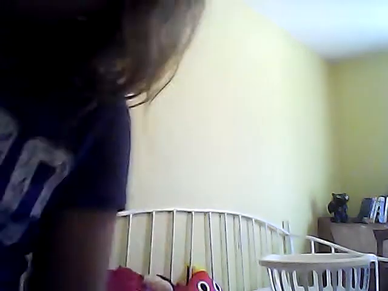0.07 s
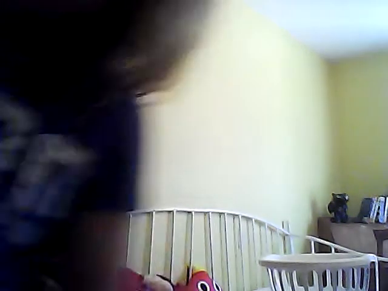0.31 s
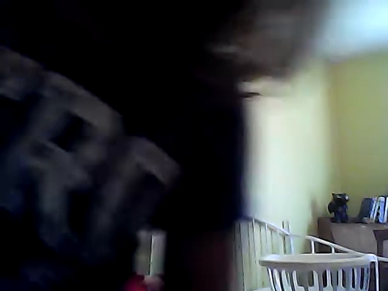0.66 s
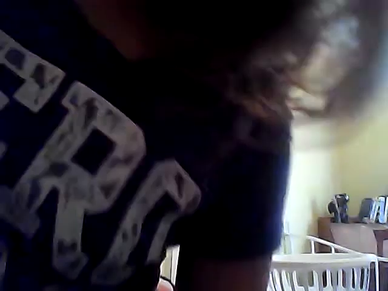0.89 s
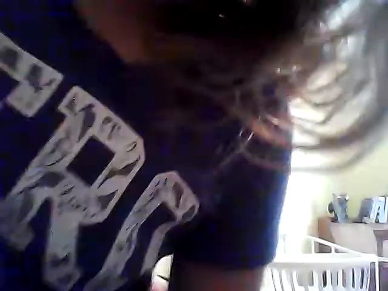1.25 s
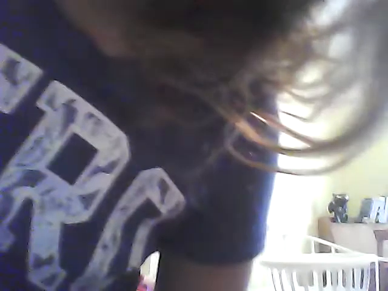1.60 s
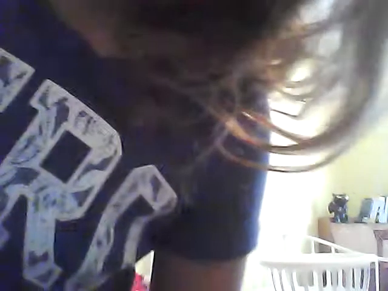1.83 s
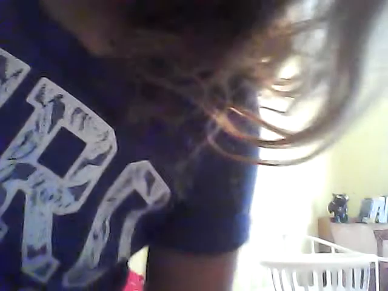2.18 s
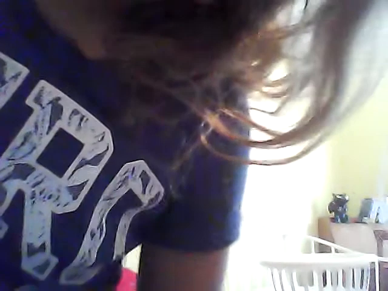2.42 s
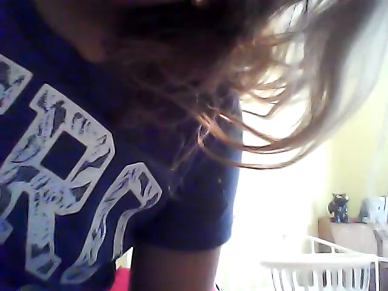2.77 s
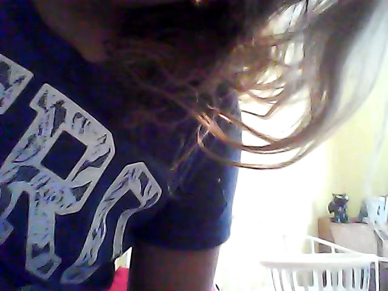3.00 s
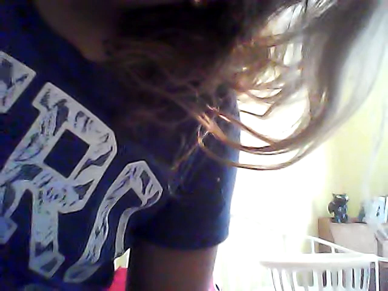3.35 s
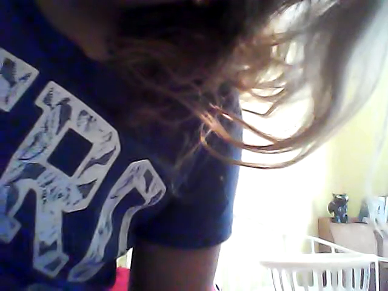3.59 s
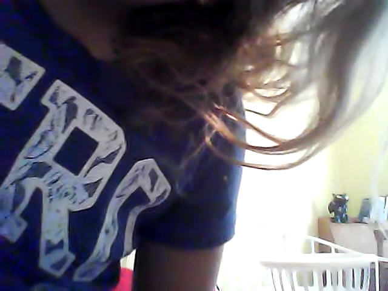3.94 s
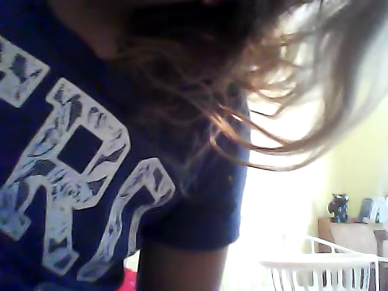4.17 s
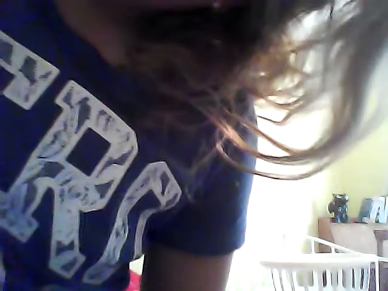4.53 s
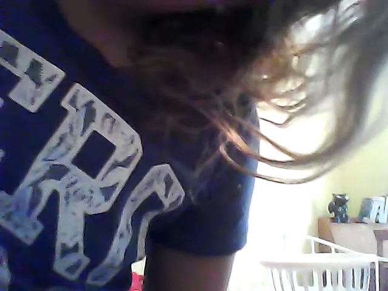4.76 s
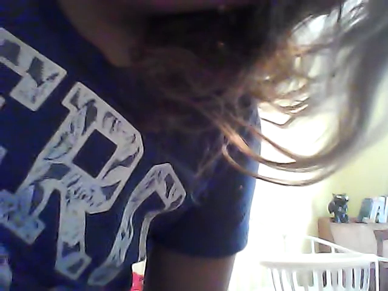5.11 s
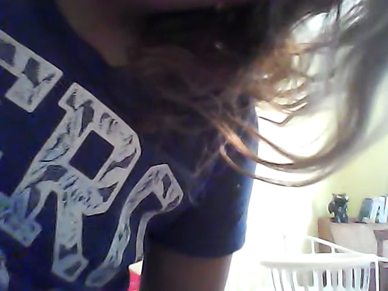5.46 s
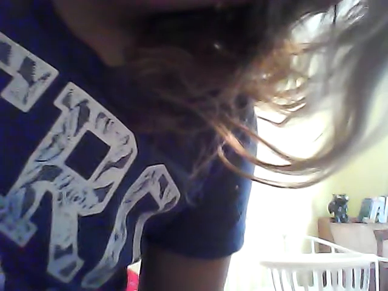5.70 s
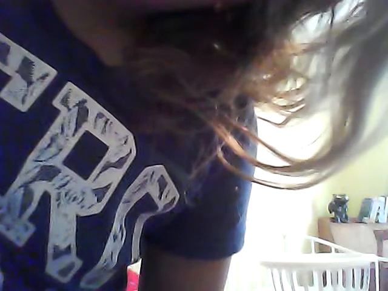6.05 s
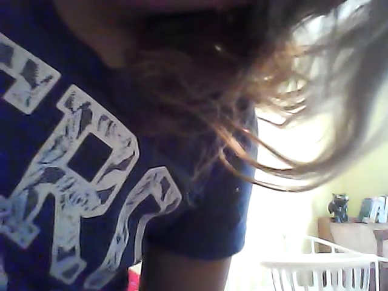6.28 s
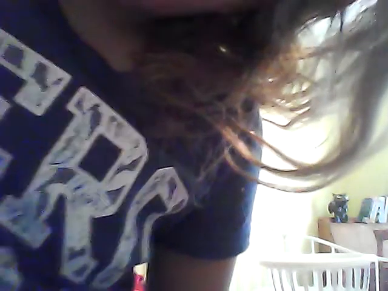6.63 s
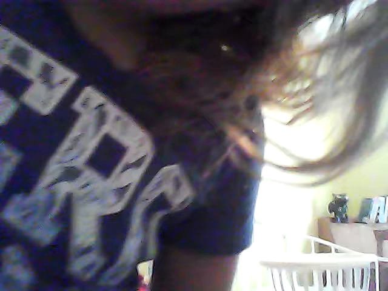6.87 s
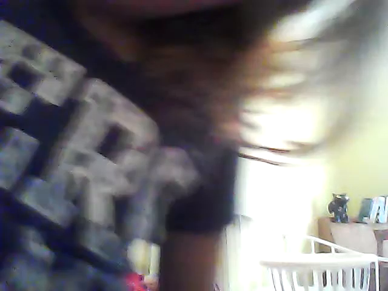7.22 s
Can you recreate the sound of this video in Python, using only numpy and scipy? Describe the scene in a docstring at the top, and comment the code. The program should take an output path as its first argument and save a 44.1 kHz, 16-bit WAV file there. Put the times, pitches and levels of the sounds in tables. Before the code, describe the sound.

Plastic things are handled right beside a microphone, with dull thumps, booming knocks, rubbing, small ticks and a hollow clatter.

```python
"""Soft rubbing and dull thumps, then booming knocks: someone at a bedroom desk fiddles with plastic
things right beside a small microphone. The knocks ring the housing that holds the microphone.
Sleeves and hands brush it, twisted plastic scrapes and ticks, a hollow object clacks on the desk.
Underneath lie low room noise, faint hiss and one thin passing tone. A limiter holds the hardest blows."""
import sys
import numpy as np
from scipy import signal
from scipy.fft import rfft, irfft
from scipy.io import wavfile
from scipy.ndimage import uniform_filter1d, minimum_filter1d

SR = 44100
rng = np.random.default_rng(int(sys.argv[2]) if len(sys.argv) > 2 else 0)


def output_pcm(signal):
    """Save a mono or channel-first signal as 16-bit PCM at the path in sys.argv[1].

    Samples are clipped to [-1, 1] before scaling.
    """
    pcm = np.clip(np.atleast_2d(signal).T, -1, 1) * 32767
    wavfile.write(sys.argv[1], SR, np.round(pcm).astype(np.int16))


N = 324135
RING_SAMPLES = 16384


def from_db(db):
    return 10 ** (np.asarray(db) / 20)


def rms_one(x):
    return x / np.sqrt(np.mean(x ** 2) + 1e-20)


def peak_one(blows):
    """Scales each row so its loudest 2 ms match a unit sine."""
    power = uniform_filter1d(blows ** 2, 88, axis=1)
    return blows / np.sqrt(2 * power.max(axis=1, keepdims=True))


def drift(knots_per_s):
    """Slow random curve, rms 1."""
    knots = rng.standard_normal(N // 40)
    return rms_one(np.interp(np.arange(N) / SR * knots_per_s, np.arange(len(knots)), knots))


def colour(x, spectrum, size=2048):
    """Minimum-phase filter from (Hz, dB) rows, along the last axis."""
    hz, db = np.transpose(spectrum)
    grid_hz = np.maximum(np.arange(size // 2 + 1) * SR / size, 1)
    magnitude = from_db(np.interp(np.log(grid_hz), np.log(hz), db))
    cepstrum = irfft(np.log(magnitude))
    cepstrum[1:size // 2] *= 2
    cepstrum[size // 2 + 1:] = 0
    pulse = irfft(np.exp(rfft(cepstrum)))
    filtered = signal.fftconvolve(np.atleast_2d(x), pulse[None], axes=1)
    return filtered[:, :x.shape[-1]].reshape(x.shape)


def resonate(x, hz, q):
    """One resonance, rms 1."""
    return rms_one(signal.lfilter(*signal.iirpeak(hz, q, fs=SR), x))


def swells(middles_s, lengths_s, levels_db):
    """Envelope of smooth rises and falls."""
    t, power = np.arange(N) / SR, np.zeros(N)
    for middle, length, db in zip(middles_s, lengths_s, levels_db):
        during = np.abs(t - middle) < length / 2
        power[during] += (from_db(db) * np.cos(np.pi * (t[during] - middle) / length)) ** 2
    return np.sqrt(power)


def slips(per_s, spread_db):
    """Friction as a stream of tiny slips of uneven size."""
    sizes = from_db(spread_db * np.minimum(rng.exponential(1, N), 4)) * rng.standard_normal(N)
    slipping = rng.random(N) < per_s * from_db(4 * drift(60)) / SR
    return sizes * slipping


def scatter(strokes, per_s, spread_db):
    """Small contacts as (s, dB) rows, strongest where the hand moves fastest."""
    rows = []
    for middle, length, db, *_ in strokes:
        jitter, force = rng.random((64, 2)).T
        s = middle - length / 2 + (np.arange(64) + jitter) / per_s
        speed = np.maximum(np.cos(np.pi * (s - middle) / length), 1e-3)
        level_db = db + 20 * np.log10(speed) + spread_db * np.sqrt(3) * (2 * force - 1)
        during = s < min(middle + length / 2, N / SR)
        rows.extend(np.transpose([s, level_db])[during])
    return np.array(rows)


def strike(starts_s, levels_db, modes, crack, crack_db, crack_t60_s, contact_s, vary_db, detune=0.027):
    """Each blow rings the modes with its own strengths and adds a short noisy crack."""
    hz, db, t60 = np.transpose(modes)[:, :, None]
    t = np.arange(min(RING_SAMPLES, int(2 * max(t60.max(), crack_t60_s) * SR))) / SR
    partials = np.sin(2 * np.pi * hz * t) * from_db(db - 60 * t / t60)
    rings = from_db(vary_db * rng.standard_normal((len(starts_s), len(modes)))) @ partials
    grips = 1 + detune * rng.standard_normal(len(starts_s))  # grip shifts the pitch
    rings = np.array([np.interp(t * grip, t, ring) for grip, ring in zip(grips, rings)])
    rings *= 1 - np.exp(-t / contact_s)  # soft contact builds slowly
    cracks = colour(rng.standard_normal(rings.shape) * from_db(-60 * t / crack_t60_s), crack)
    blows = peak_one(peak_one(rings) + from_db(crack_db) * peak_one(cracks))
    out = np.zeros(N + RING_SAMPLES)
    for s, gain, blow in zip(starts_s, from_db(levels_db), blows):
        start = max(round(s * SR), 0)
        out[start:start + len(t)] += gain * blow
    return out[:N]


# Steady noise spectra. Each row: frequency in Hz, density in dB.
ROOM_NOISE_SPECTRUM = [(25, -1), (70, 0.5), (135, 8), (190, -5.5), (270, -4.5), (700, -11), (1400, -12.5),
                       (2400, -18), (4000, -29), (16000, -51)]
HISS_SPECTRUM = [(1000, -23), (4000, -22.5), (6500, -14.5), (8100, -7.5), (9000, -7), (10200, -1.5),
                 (11800, -8.5), (13000, -9), (15500, -7.5), (16500, -11)]
# Hiss contour. Each row: time in seconds, relative level in dB.
HISS_CONTOUR = [(0.0, -65.5), (1.14, -62), (1.6, -56), (2.48, -66), (3.01, -61.5), (3.25, -65),
                (3.81, -66.5), (4.09, -62), (5.4, -60), (5.55, -53), (5.71, -55), (6.04, -61.5),
                (6.79, -63), (7.06, -60.5), (7.19, -56.5), (7.35, -77)]


def background():
    """Low room noise and a thin hiss that swells and sinks."""
    rumble, hiss = rng.standard_normal((2, N))
    rumble = from_db(-66) * rms_one(colour(rumble, ROOM_NOISE_SPECTRUM))
    hiss_db = np.interp(np.arange(N) / SR, *np.transpose(HISS_CONTOUR)) - 5
    return rumble + from_db(hiss_db) * rms_one(colour(hiss, HISS_SPECTRUM))


# Room decay. Each row: low edge in Hz, high edge in Hz, T60 in seconds, level in dB.
ROOM_BANDS = [(90, 270, 0.3, -2), (302, 510, 0.17, -8), (905, 2900, 0.28, -1.5), (3000, 40000, 0.14, -4)]


def bedroom(x, first_echo_s=0.012):
    """A diffuse tail starts with the nearest wall and dies band by band."""
    t = np.arange(RING_SAMPLES) / SR
    tail = 0
    for low_hz, high_hz, t60, db in ROOM_BANDS:
        band = signal.butter(2, [low_hz, min(high_hz, 0.45 * SR)], "band", fs=SR, output="sos")
        echoes = rng.standard_normal(len(t)) * (t > first_echo_s) * from_db(db - 60 * t / t60)
        tail = tail + signal.sosfilt(band, echoes)
    return signal.fftconvolve(x, tail / np.sqrt(np.sum(tail ** 2)))[:N]


def faint_tone(middle_s=3.45, length_s=0.8, level_db=-68):
    """A thin tone wavers and sinks, barely above the hiss."""
    middle_hz, sag_hz_per_s, waver_hz = 684, 100, 14
    hz = middle_hz - sag_hz_per_s * (np.arange(N) / SR - middle_s) + waver_hz * drift(25)
    tone = rms_one(np.sin(2 * np.pi * np.cumsum(hz) / SR))
    return swells([middle_s], [length_s], [level_db]) * tone


# Swells of fine hiss. Each row: middle in seconds, length in seconds, level in dB.
FINE_HISS_SWELLS = [(4.081, 0.92, -63.5)]


def fine_hiss(hz=10010, q=4.7):
    """A fine, narrow hiss near 10 kHz swells and fades."""
    hiss = resonate(rng.standard_normal(N), hz, q)
    return swells(*np.transpose(FINE_HISS_SWELLS)) * resonate(hiss, hz, q)


# Brief judder. Each row: middle in seconds, length in seconds, pitch in Hz, level in dB.
JUDDER = [(.824, 0.041, 305.4, -35.5)]


def judder():
    """Regular slips give a short tone."""
    middle_s, length_s, hz, db = JUDDER[0]
    tone = rms_one(np.sin(2 * np.pi * hz * np.arange(N) / SR))
    return swells([middle_s], [length_s], [db]) * tone


# Contact noise of a wall. Each row: frequency in Hz, density in dB.
WALL_SPECTRUM = [(100, -5), (400, 0.5), (700, 3), (1000, 0.5), (1550, -0.5), (1900, -10), (2500, -6.5),
                 (3300, -15.5), (6000, -57), (16000, -61)]


def brushing():
    """A wandering touch excites the wall modes unevenly: colour shifts, level stays even."""
    friction = colour(slips(per_s=5000, spread_db=2.6), WALL_SPECTRUM)
    brush = rms_one(friction)
    for hz, db, _ in WALL_MODES:
        brush += from_db(db - 14.5 + 16 * drift(35)) * resonate(friction, hz, q=5.3)
    return brush / np.sqrt(uniform_filter1d(brush ** 2, size=2600) + 1e-12)


# Hand and sleeve strokes. Each row: middle in seconds, length in seconds, rub in dB, brush in dB.
STROKES = [(0.0, 0.0793, -49, -61.5), (0.098, 0.019, -54, -58.5), (0.304, 0.36, -47, -61),
           (0.474, 0.05, -34, -47.5), (0.785, 0.081, -55, -56.5), (0.979, 0.028, -56, -83),
           (1.104, 0.089, -42, -55.5), (1.21, 0.12, -39.5, -48), (1.361, 0.18, -35, -46.5),
           (1.516, 0.094, -30.5, -41), (1.688, 0.11, -38.5, -42.5), (1.881, 0.16, -41.5, -48),
           (2.501, .24, -44.5, -53.5), (2.874, 0.35, -29.5, -43), (3.128, 0.16, -30, -45),
           (3.491, 0.13, -53, -57), (4.143, 0.23, -54.5, -60), (4.566, 0.23, -47.5, -60),
           (4.928, 0.48, -37.5, -56.5), (5.716, 0.56, -33, -31.5), (6.063, 0.11, -44.5, -51.5),
           (6.308, 0.13, -34.5, -38.5), (6.468, 0.13, -45.5, -54), (6.747, 0.19, -42.5, -48.5),
           (6.973, 0.24, -26, -32.5)]
# Low friction noise. Each row: frequency in Hz, density in dB.
RUB_SPECTRUM = [(30, -50.5), (65, -19), (110, -5.5), (145, 9), (195, 1), (270, 5), (340, 0.5), (408, 2),
                (480, -5), (650, -25), (1000, -36), (3000, -59), (16000, -78.5)]


def rubbing():
    """Sleeves and hands drag over the housing: a low rub and a brighter brush."""
    middle_s, length_s, rub_db, brush_db = np.transpose(STROKES)
    rub = rms_one(colour(slips(per_s=400, spread_db=2.2), RUB_SPECTRUM))
    return swells(middle_s, length_s, rub_db) * rub + swells(middle_s, length_s, brush_db) * brushing()


# Twists of plastic on plastic. Each row: middle in seconds, length in seconds, level in dB.
TWISTS = [(1.686, 0.095, -49.5), (2.081, 0.11, -48.5), (2.528, 0.054, -63), (2.671, 0.091, -54),
          (2.905, 0.26, -49.5), (3.134, 0.15, -54), (3.918, 0.14, -45.5), (4.208, 0.23, -60),
          (4.503, 0.089, -54), (4.578, 0.071, -44.5), (4.788, 0.26, -53.5), (5.617, 0.54, -45.5),
          (5.823, 0.27, -38.5), (6.31, 0.078, -51), (6.493, 0.31, -65), (6.791, 0.12, -61.5),
          (6.905, 0.077, -37.5), (7.049, 0.23, -41)]
# Plastic friction noise. Each row: frequency in Hz, density in dB.
GRIT_SPECTRUM = [(400, -10.5), (1500, 4), (2000, -7), (2800, -14.5), (3600, -7.5), (4700, -7), (5600, -12),
                 (9500, -13), (16000, -29)]


def scraping(squeak_hz=3540, squeak_q=3.1, squeak_db=-5.5):
    """Plastic scrapes in coarse slips, which also ring the parts in spurts."""
    flicker = from_db(7.5 * np.clip(drift(130), -2, 2))
    grit = rms_one(flicker * colour(slips(per_s=9000, spread_db=4.7), GRIT_SPECTRUM))
    spurts = from_db(9.5 * drift(90))
    ringing = resonate(slips(per_s=6900, spread_db=1.5), squeak_hz, squeak_q)
    squeak = from_db(squeak_db) * resonate(spurts * ringing, squeak_hz, squeak_q)
    return swells(*np.transpose(TWISTS)) * (grit + squeak)


# Small parts snapping out of a catch. Each row: start in seconds, relative level in dB.
SNAPS = [(1.4242, -35.5), (1.5978, -39.5), (2.0837, -30.5), (2.169, -45.5), (3.3383, -44.5), (3.8008, -39),
         (3.9472, -32.5), (4.088, -38), (4.1716, -35.5), (4.2705, -41), (4.593, -29), (4.7217, -29),
         (4.8471, -26.5), (4.8806, -29.5), (5.0815, -31.5), (5.6433, -23), (5.7634, -23), (5.7945, -22.5),
         (5.838, -25), (5.8761, -23.5), (5.8979, -22), (6.2911, -35), (6.3264, -27.5), (6.3867, -40),
         (6.4766, -45), (6.8272, -35.5), (7.073, -19.5), (7.0888, -28), (7.1092, -33), (7.1577, -27.5)]
# Modes of small parts and edges. Each row: frequency in Hz, level in dB, T60 in seconds.
PLASTIC_MODES = [(2520, -4, .022), (2970, -4, .024), (3560, 0, .026), (4000, -4, .016), (4600, -2, .016)]


def ticks():
    """Twisted parts catch and slip: short grainy squeaks, each with its own pitch."""
    twist_ticks = [(s, db + 10) for s, db in scatter(TWISTS, per_s=40, spread_db=4)]
    start_s, db = np.transpose(SNAPS + twist_ticks)
    catch = strike(start_s - 0.002, db - 9.5, PLASTIC_MODES, GRIT_SPECTRUM,
                   crack_db=0, crack_t60_s=0.025, contact_s=0.0022, vary_db=5, detune=0.09)
    slip = strike(start_s + 0.001, db - 4, PLASTIC_MODES[2:], GRIT_SPECTRUM,
                  crack_db=1.5, crack_t60_s=0.025, contact_s=0.0031, vary_db=1.5, detune=0.09)
    return catch + slip


# Contact noise of a hard edge. Each row: frequency in Hz, density in dB.
EDGE_SPECTRUM = [(300, -25), (1500, 9.5), (2700, -11.5), (3600, 5.5), (4700, -5.5), (5500, -8), (7400, -8),
                 (8300, -12), (9300, -8), (12000, -16), (16000, -19)]


def click(starts_s, levels_db):
    """A hard plastic edge snaps, then lets go more weakly 2-9 ms later."""
    release_s = starts_s + 0.002 + 0.007 * rng.random(len(starts_s))
    snaps_s = np.concatenate([starts_s, release_s])
    snaps_db = np.concatenate([levels_db - 4.5, levels_db - 14])
    return strike(snaps_s, snaps_db, PLASTIC_MODES, EDGE_SPECTRUM,
                  crack_db=6, crack_t60_s=0.023, contact_s=0.00023, vary_db=-1.5, detune=0.05)


# Padded blows. Each row: start in seconds, thud in dB, bump in dB.
THUMPS = [(0.352, -16.5, -44), (0.544, -16, -48), (1.333, -20, -24.5), (1.4224, -10.5, -3),
          (1.592, -11, -4.5), (1.67, -13, -32.5)]
# Low and middle body modes. Each row: frequency in Hz, level in dB, T60 in seconds.
THUD_MODES = [(69, -12, 0.24), (111, 2.5, 0.084), (132, 1.5, 0.12), (157.4, -2.5, 0.17), (208, -16, 0.25),
              (286, -12.5, 0.15)]
BUMP_MODES = [(330.2, 9.5, 0.018), (395.8, -9, 0.2), (458, -0.5, 0.032), (491, -16.5, 0.11),
              (842, -10, 0.06)]
# Dull contact noise. Each row: frequency in Hz, density in dB.
DULL_SPECTRUM = [(30, -25), (70, -16), (140, -12), (260, -2.5), (450, 5), (650, -28.5), (1000, -38.5),
                 (2000, -55.5), (16000, -84)]


def thumps():
    """Padded blows: a low thud and a short bump, no click."""
    start_s, thud_db, bump_db = np.transpose(THUMPS)
    thud = strike(start_s, thud_db, THUD_MODES, DULL_SPECTRUM,
                  crack_db=-20.5, crack_t60_s=0.25, contact_s=0.0015, vary_db=2.5)
    bump = strike(start_s, bump_db, BUMP_MODES, DULL_SPECTRUM,
                  crack_db=-1.5, crack_t60_s=0.0077, contact_s=0.0015, vary_db=3.5)
    return thud + bump


# Landings of a small hollow object. Each row: start in seconds, level in dB.
CLACKS = [(5.338, -22.5), (5.3444, -9), (5.441, -20.5), (5.454, 1), (5.472, -13), (5.532, 0), (5.5461, -3),
          (5.582, -14.5)]
# Its shell modes. Each row: frequency in Hz, level in dB, T60 in seconds.
SHELL_MODES = [(859, -7, 0.07), (907.3, -6, 0.12), (985, 11, 0.021), (1048, -3, 0.073), (1238, -8, 0.059),
               (1550, -20, 0.19)]


def clacks():
    """A hollow object is set down and bounces; the desk answers faintly."""
    start_s, db = np.transpose(CLACKS)
    shell = strike(start_s, db, SHELL_MODES, WALL_SPECTRUM,
                   crack_db=-9, crack_t60_s=0.044, contact_s=0.0023, vary_db=0.5, detune=0.0018)
    desk = strike(start_s, db - 20, THUD_MODES[2:], DULL_SPECTRUM,
                  crack_db=-27.5, crack_t60_s=0.1, contact_s=0.01566, vary_db=4)
    return shell + desk + click(start_s, db - 18)


# Knocks on the housing. Each row: start in seconds, strength in dB, hardness in dB
# (below 0 a fingertip, above 0 a plastic edge).
KNOCKS = [(0.461, -43, -11), (1.323, -32, -6.5), (1.636, -34, -15.5), (1.656, -20.5, 6), (1.9, 5, 3),
          (1.927, -7, -4.5), (1.9609, -11, -5.5), (2.061, -25, 4.5), (2.075, -34.5, -12), (2.652, -23, -9),
          (2.823, -26.5, -5), (2.868, -31.5, 9.5), (2.914, -23, -7.5), (3.112, -31.5, -11),
          (3.773, -45, -10.5), (3.904, -20, 4.5), (4.039, -25, -9.5), (4.403, -31.5, 3), (4.5, -37.5, -3),
          (4.554, -38.5, 4), (4.566, -29, 2), (4.803, -33.5, -7.5), (4.975, -18.5, 0.5), (5.011, -22.5, 1),
          (5.054, -21, 2.5), (5.08, -33, 1.5), (5.677, -6, -5), (5.697, -13.5, -12), (5.716, -21.5, -12),
          (5.774, -19.5, -7.5), (5.811, -20, -6.5), (5.86, -18.5, -2), (5.95, -13.5, -8), (6.113, -29.5, 0),
          (6.204, -27, -3.5), (6.276, -34.5, -12), (6.315, -27, -3), (6.465, -40.5, -14),
          (6.652, -41, -10.5), (6.742, -24.5, -6.5), (6.899, -20.5, -6), (6.951, -14, -7.5),
          (6.957, -17, -10.5)]
# Modes of the housing and of its walls. Each row: frequency in Hz, level in dB, T60 in seconds.
HOUSING_MODES = [(145.5, -19, 0.25), (169, -19.5, 0.16), (233.3, -18.5, 0.16), (269.4, -6.5, 0.08),
                 (322, -16, 0.11), (413.5, -2, 0.15), (449, -14, 0.092), (520, -23, 0.28), (620, -15, .12)]
WALL_MODES = [(839.7, -4.5, 0.065), (980.4, 5.5, 0.042), (1188, -2, 0.0091), (1245, -19.5, 0.1),
              (1346, -11, 0.08), (1536, -5.5, 0.043), (1572, -15, 0.044), (2144, -24.5, 0.077),
              (2410, -14.5, 0.043)]


def knocks(nudge_db=-8.5, nudge_hardness_db=-9.5):
    """The housing booms, its walls rap, the contact clicks; hardness trades boom for click."""
    touches = scatter(STROKES, per_s=14, spread_db=2.5)
    nudges = [(s, db + nudge_db, nudge_hardness_db) for s, db in touches]
    start_s, strength_db, hardness_db = np.transpose(KNOCKS + nudges)
    boom_db = strength_db - hardness_db
    rap_db = 5.5 + 1.102 * strength_db
    # Hard blows ring the free housing; in light ones the fingers stay on and shift its pitch.
    finger_detune = np.interp(boom_db, [-26, -15], [0.08, 0.005])
    boom = strike(start_s, boom_db, HOUSING_MODES, DULL_SPECTRUM,
                  crack_db=-7, crack_t60_s=0.1, contact_s=0.0016, vary_db=2.5, detune=finger_detune)
    rap = strike(start_s, rap_db, WALL_MODES, WALL_SPECTRUM,
                 crack_db=2, crack_t60_s=0.036, contact_s=0.00071, vary_db=5.5, detune=0.0063)
    return boom + rap + click(start_s, strength_db + hardness_db)


def scene():
    """Close handling reaches the microphone directly; clacks and thumps carry more room."""
    near = knocks() + ticks() + rubbing() + judder() + scraping() + fine_hiss()
    hollow, dull = clacks(), thumps()
    room = bedroom(from_db(-21) * near + from_db(-18) * hollow + from_db(-12) * dull)
    return (near + hollow + dull + room + faint_tone() + background())[None]


def record(dry):
    """The small microphone loses deep bass, a fast limiter holds the peaks, then the top is cut."""
    low_hz, high_hz = 60, 16000
    ceiling, release_db_per_s = 0.8, 450
    heard = signal.sosfilt(signal.butter(3, low_hz, "high", fs=SR, output="sos"), dry)
    over_db = 20 * np.log10(np.maximum(np.abs(heard[0]) / ceiling, 1))
    release_db = release_db_per_s * np.arange(N) / SR
    gain = from_db(release_db - np.maximum.accumulate(over_db + release_db))
    gain = uniform_filter1d(minimum_filter1d(gain, size=45), size=45)  # 1 ms look-ahead
    return signal.sosfilt(signal.cheby1(12, 0.3, high_hz, fs=SR, output="sos"), heard * gain)


dry = scene()
out = record(dry)
output_pcm(out)
```